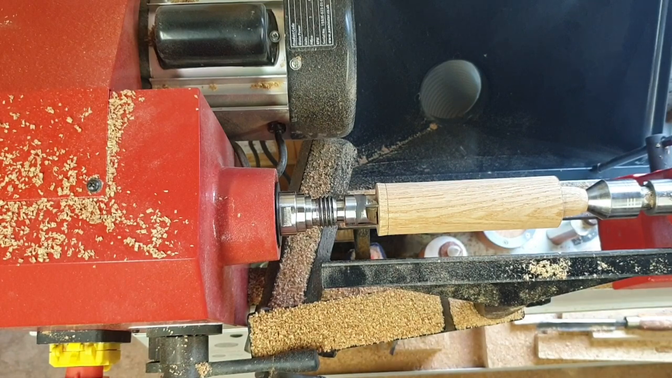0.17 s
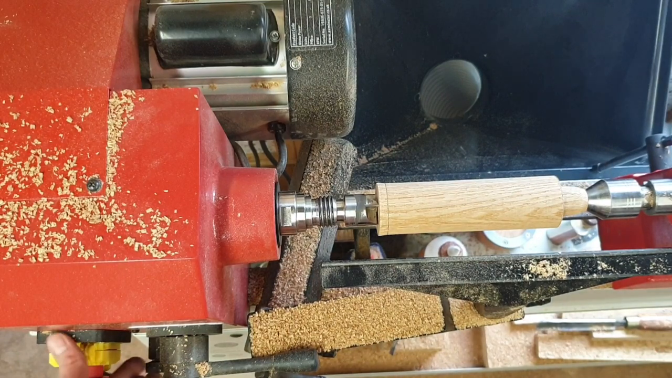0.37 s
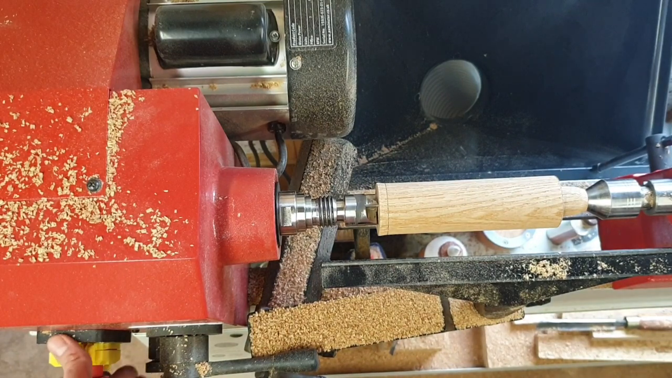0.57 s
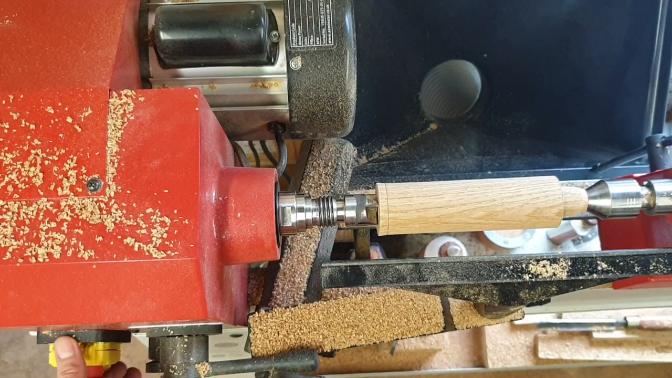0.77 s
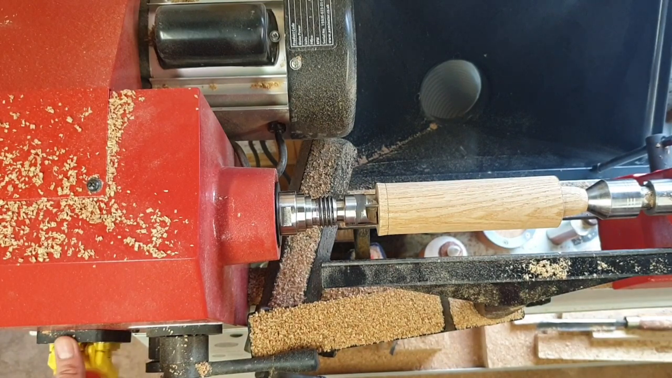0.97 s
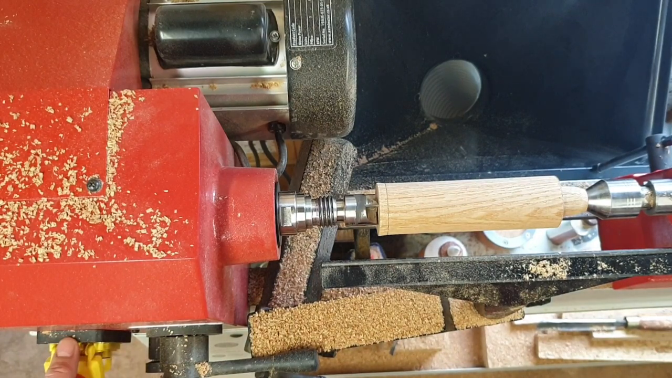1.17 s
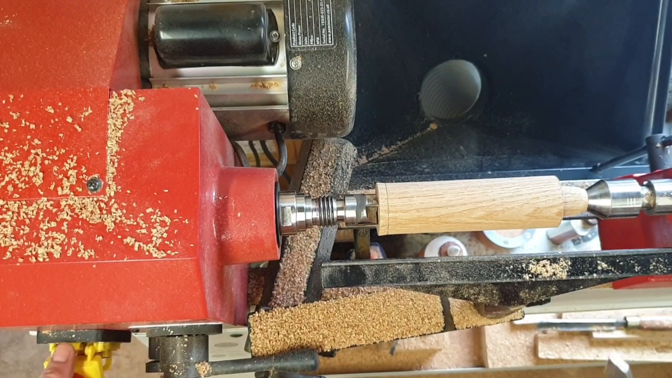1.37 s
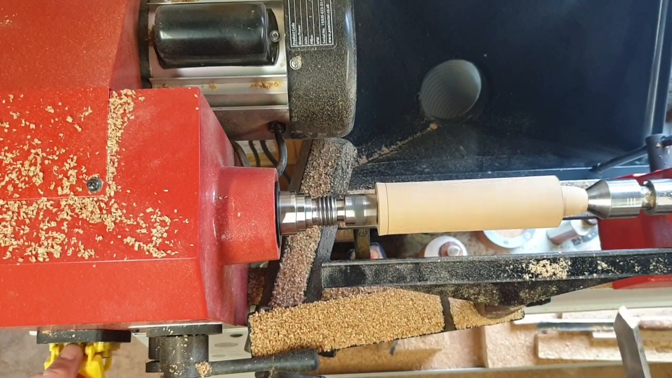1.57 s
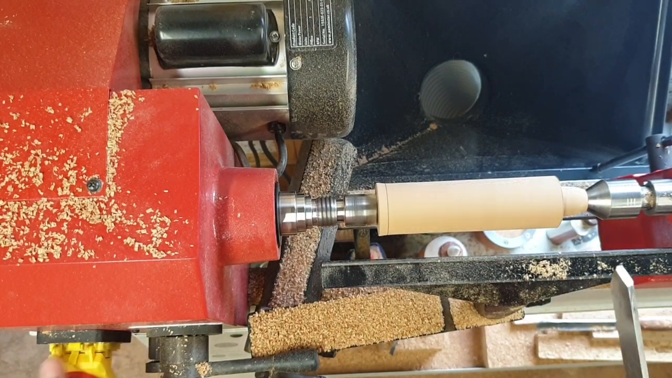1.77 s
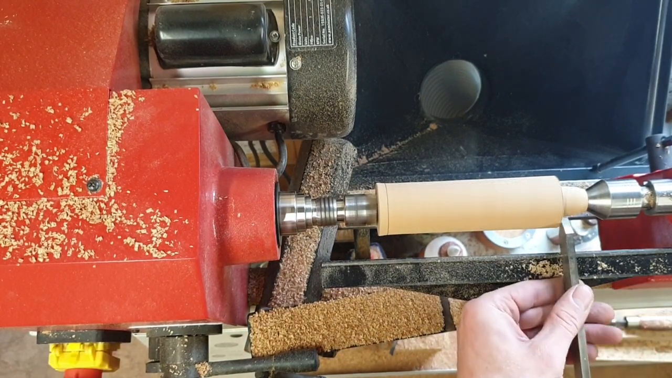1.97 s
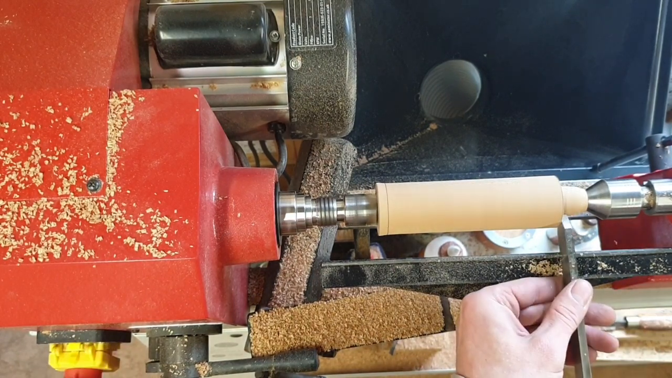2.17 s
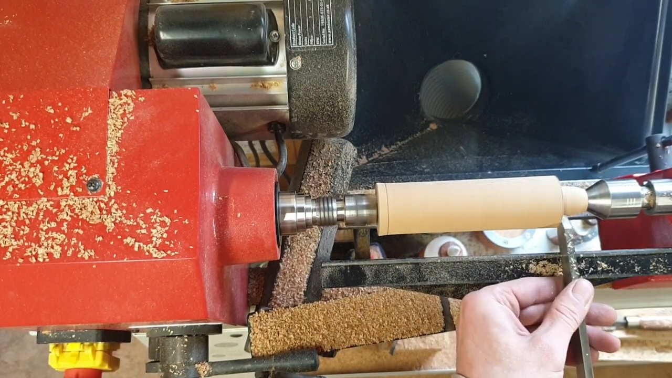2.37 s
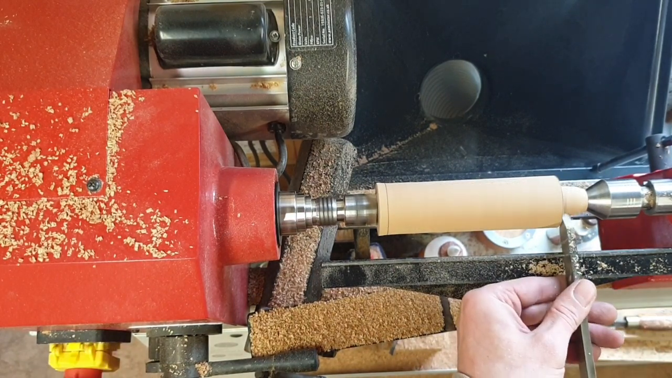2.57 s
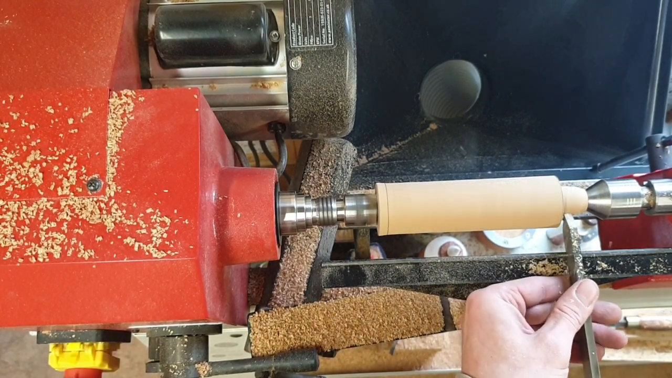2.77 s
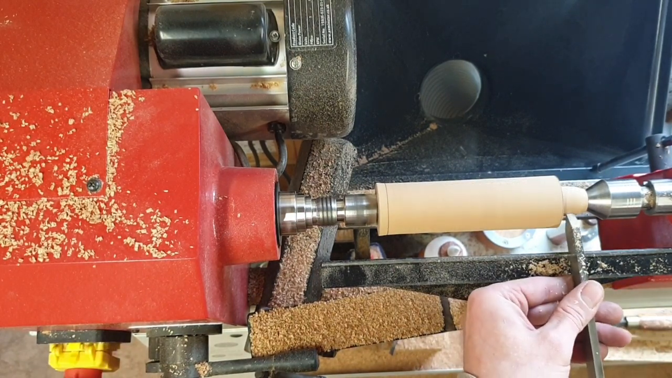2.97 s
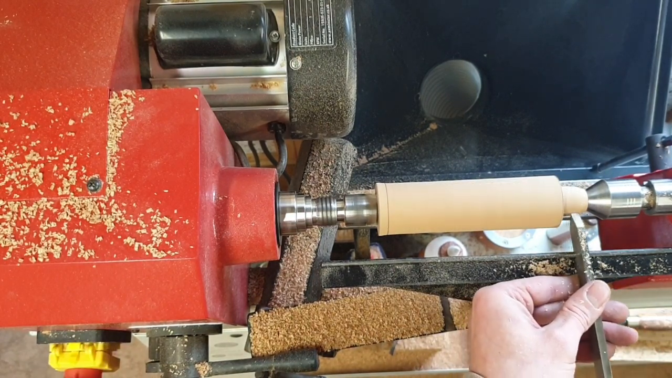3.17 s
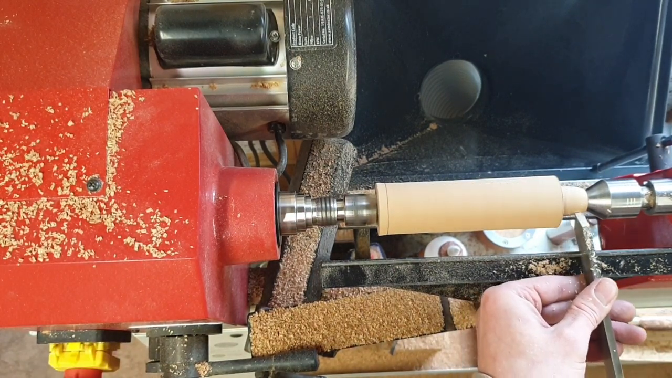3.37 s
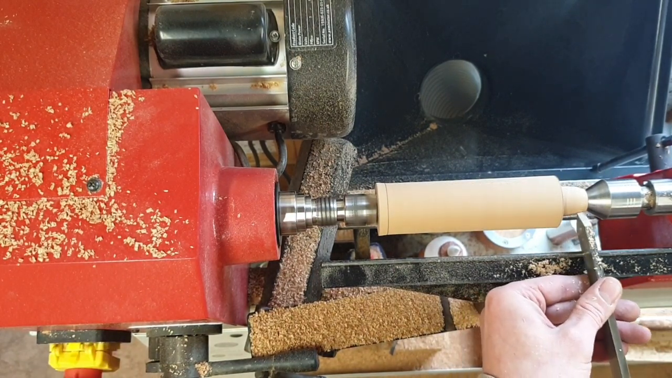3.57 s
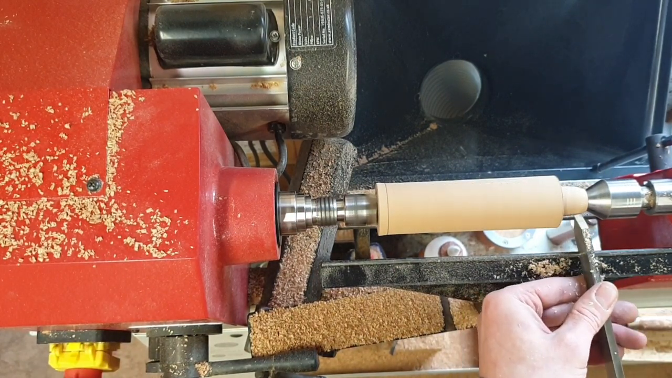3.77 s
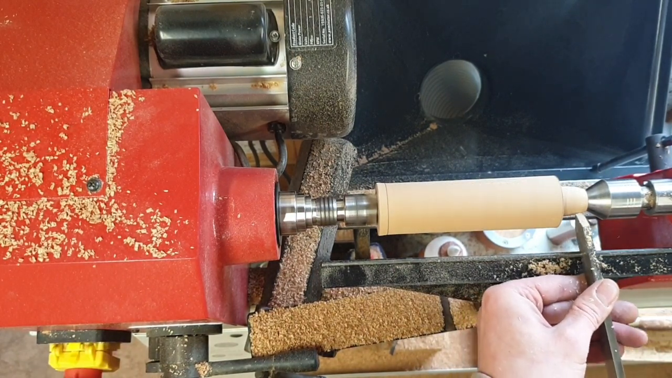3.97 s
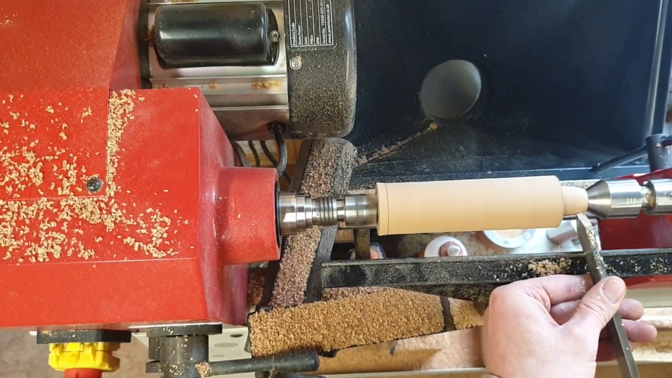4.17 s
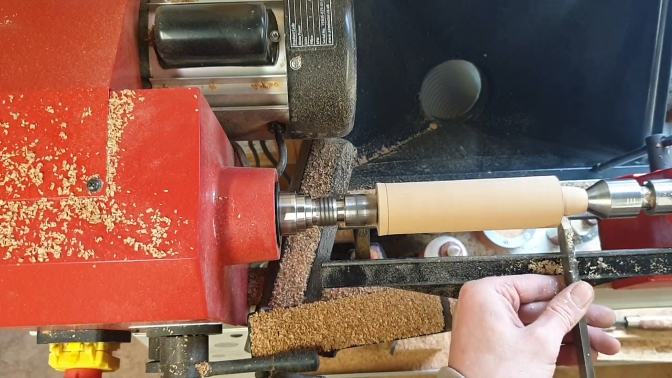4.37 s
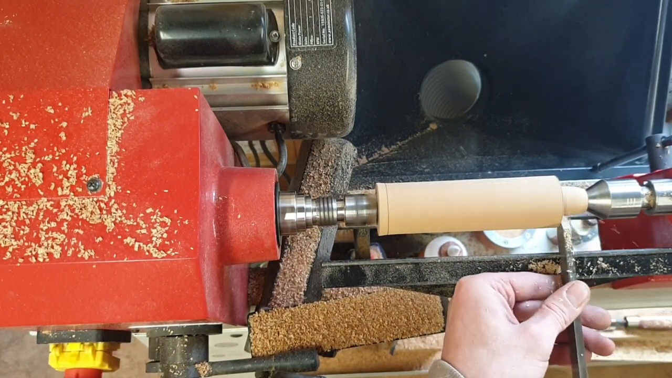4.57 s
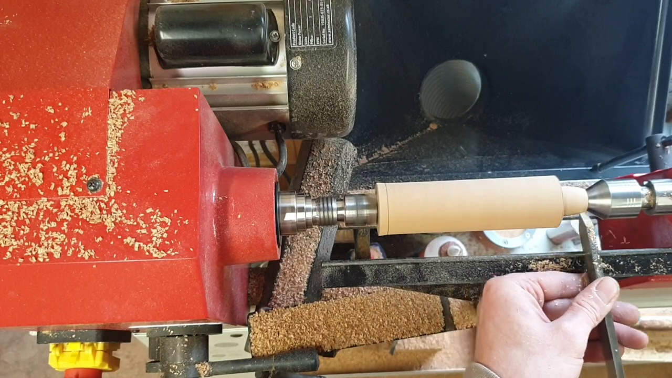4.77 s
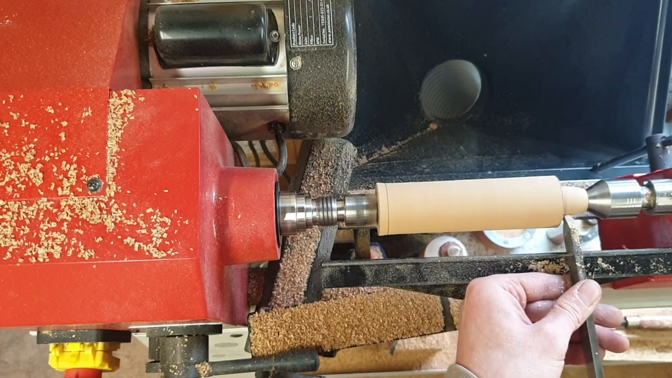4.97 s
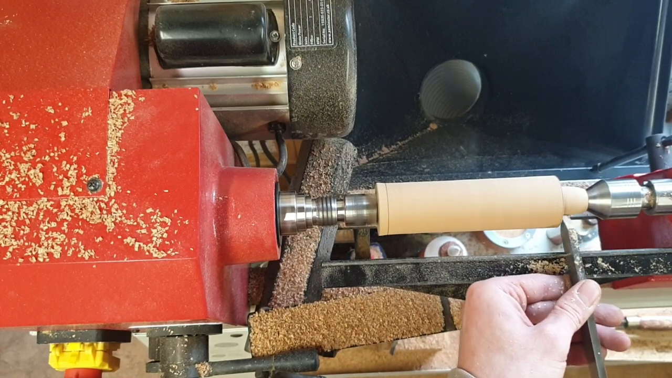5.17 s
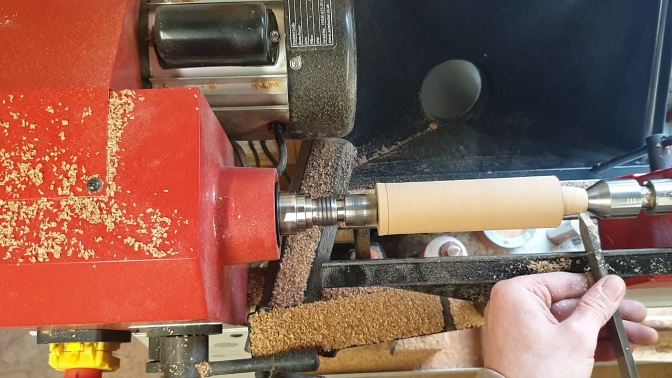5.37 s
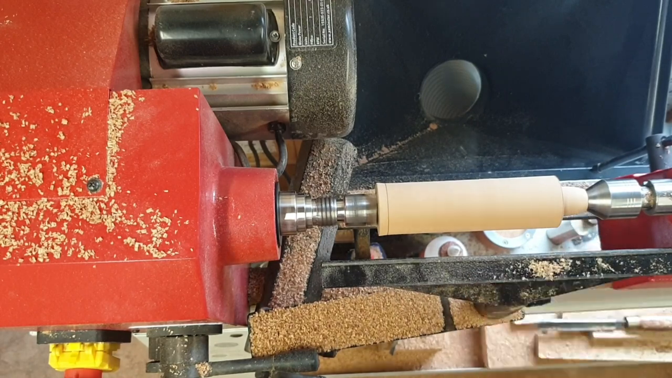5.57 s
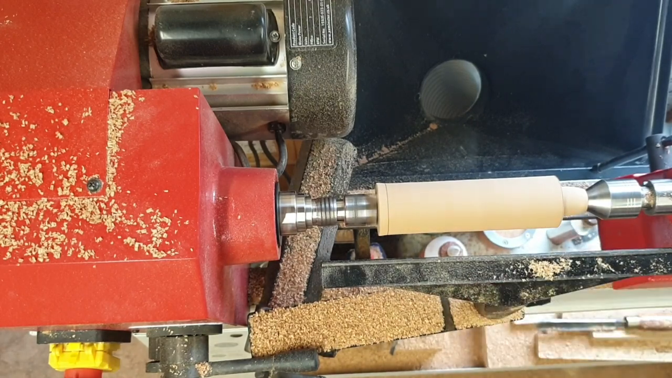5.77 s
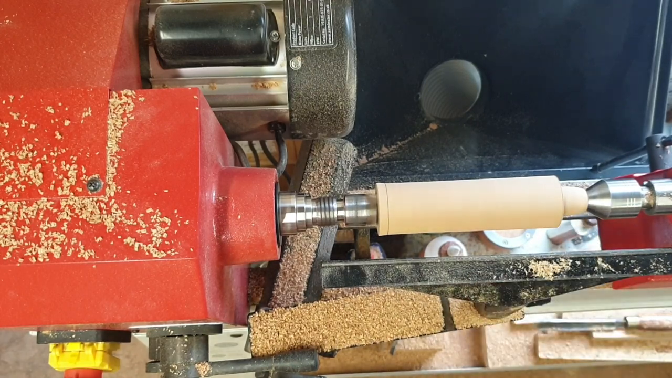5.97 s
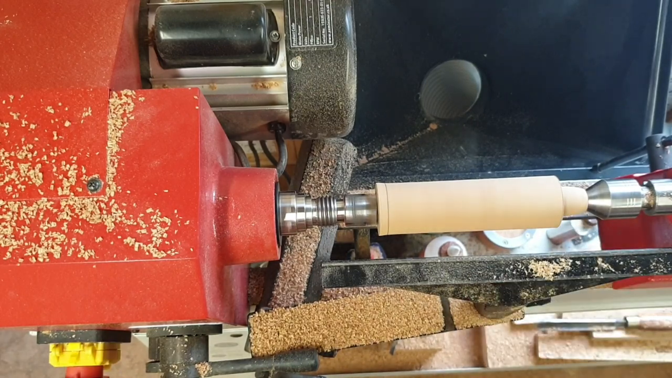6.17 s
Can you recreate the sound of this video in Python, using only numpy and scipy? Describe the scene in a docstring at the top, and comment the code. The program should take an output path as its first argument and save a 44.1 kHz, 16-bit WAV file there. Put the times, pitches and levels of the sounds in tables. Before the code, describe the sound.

In a quiet workshop, a hand makes a few soft, low bumps and faint clicks on a small wood lathe. At about 1 second the switch clacks. Around 1.6 seconds a louder metallic clank starts the belt, and the machine spins up with another knock and a brief shudder. It settles into a steady drone with a light rattle of pulleys and bearings. From about 2 seconds a chisel bites the spinning wood in short, uneven strokes, each a raspy hiss with a slight ring of steel and a growl from the tool rest. The longest cut runs from about 4.3 to 4.8 seconds. The cutting ends near 5.5 seconds and the lathe runs on alone until a last knock just after 6 seconds, when the sound quickly dies away. Everything is heard from close above, with a short room reverb.

```python
"""Soft bumps of a hand on a small wood lathe, then the clack of its switch and a clank as the belt starts.
The drive shakes the frame into a drone while loose pulleys and bearings rattle against the housing.
A chisel bites the spinning blank in short strokes: snapping fibres hiss, the steel rings, the rest growls.
With a last knock the running sound dies away. All is heard from just above, in a short workshop reverb."""
import sys
import numpy as np
from scipy import signal
from scipy.fft import rfft, irfft, next_fast_len
from scipy.io import wavfile
from scipy.ndimage import map_coordinates

SR = 44100
rng = np.random.default_rng(int(sys.argv[2]) if len(sys.argv) > 2 else 0)


def wav_record(signal):
    """Record a signal, one row per channel, as 16-bit PCM in the file named by sys.argv[1]."""
    frames = np.transpose(np.atleast_2d(signal))
    bounded = np.clip(frames, -1, 1)
    # unit amplitude maps onto the largest positive 16-bit level
    quanta = np.round(bounded * 32767).astype(np.int16)
    wavfile.write(sys.argv[1], SR, quanta)


N = 274698


def amp(db):
    """Decibels to gain."""
    return 10 ** (np.asarray(db) / 20)


def unit(x):
    """Scaled to rms 1."""
    return x / np.sqrt(np.mean(x ** 2) + 1e-20)


def clock():
    """The time of every sample."""
    return np.arange(N) / SR


def since(s):
    """Seconds gone by since s; 0 before it."""
    return np.maximum(clock() - s, 0)


def along(points, hz):
    """A curve through (Hz, value) points on a log frequency axis."""
    f, v = np.transpose(points)
    return np.interp(np.log(hz + 1), np.log(f + 1), v)


def wobble(rate):
    """A smooth random modulator of rms 1, rate knots a second."""
    return unit(map_coordinates(rng.standard_normal(int(N * rate / SR) + 4), [clock() * rate]))


def filtered(x, response):
    """x times a complex response of frequency."""
    size = next_fast_len(N + SR // 2)
    return irfft(rfft(x, size) * response(np.fft.rfftfreq(size, 1 / SR)), size)[..., :N]


def coloured(x, spectrum):
    """x through an EQ curve, at rms 1."""
    return unit(filtered(x, lambda hz: amp(along(spectrum, hz))))


def resonate(x, modes):
    """x rings a bank of resonances of alternating polarity; rms 1."""
    def bank(f):
        return sum((-1) ** k * amp(db) * 1j * f * width / (hz * hz - f * f + 1j * f * width)
                   for k, (hz, width, db) in enumerate(modes))
    return unit(filtered(x, bank))


# stereo image: (frequency [Hz], left-right likeness [-1..1])
LIKENESS = [(60, 1), (290, 0.97), (640, 0.74), (1410, 0.25), (3100, -0.48), (6800, 0.19), (15000, -0.31)]
# the machine stands a little to the left: (frequency [Hz], left over right [dB])
BALANCE = [(60, .4), (200, 1.8), (380, 1.1), (700, -.3), (1300, 1.8), (2400, -.7), (4400, -1), (8000, .5),
           (15000, 1.5)]

def spread(pair):
    """Two unrelated signals become left and right: alike in the bass, wide in the treble."""
    def mid_side(hz):
        angle = np.arccos(np.clip(along(LIKENESS, hz), -1, 1)) / 2
        return np.array([np.cos(angle), np.sin(angle)])
    mid, side = filtered(pair, mid_side)
    stereo = np.array([mid + side, mid - side])
    return unit(filtered(stereo, lambda hz: amp(np.outer([.5, -.5], along(BALANCE, hz)))))


def noise():
    """White stereo noise."""
    return spread(rng.standard_normal((2, N)))


def grains(rate, scatter_db):
    """Tiny impacts of uneven size at random moments, rate a second."""
    hit = rng.random(N) < rate / SR
    size = amp(scatter_db * np.clip(rng.standard_normal(N), -2, 2))
    return spread(hit * size * rng.standard_normal((2, N)))


# EQ of the quiet workshop: (frequency [Hz], level [dB])
ROOM_TONE_EQ = [(15, -39), (25, -12), (70, 1), (473, -27), (929, -27), (1010, -26), (3580, -27.5),
                (7420, -37), (10500, -30), (15800, -30)]

def room_tone():
    """A faint bed of low rumble and air under everything."""
    return amp(-69) * coloured(noise(), ROOM_TONE_EQ)


# bump cues: (time [s], hold [s], level [dB])
HAND_BUMPS = [(0.024, 0.054, -47), (.075, .015, -43), (0.193, .05, -57), (0.304, 0.041, -56),
              (.41, 0.027, -71), (0.48, .04, -70), (.699, 0.062, -55), (1.37, .05, -65)]
# EQ of a thud through the bench: (frequency [Hz], level [dB])
BUMP_EQ = [(25, -10), (70, 0), (125, 3), (220, -12), (300, -15.5), (500, -25), (1000, -37), (2000, -42),
           (4000, -85)]

def hand_bumps(attack_s=0.01, t60=0.28):
    """The hand's bumps come through the bench as soft, bassy thuds."""
    envelope = sum(amp(db - 60 * since(s + hold) / t60) * np.tanh(since(s) / attack_s)
                   for s, hold, db in HAND_BUMPS)
    return envelope * coloured(noise(), BUMP_EQ)


def struck(modes):
    """One blow: each resonance rings at its own phase, and the wider it is the sooner it dies."""
    hz, width, db = np.transpose(modes)[:, :, None]
    t = np.arange(SR // 4) / SR
    phase = rng.uniform(0, 2 * np.pi, (2, len(modes), 1))
    size = amp(db) * np.sqrt(width)  # wide resonances take up more of the blow
    ring = (size * np.sin(2 * np.pi * hz * t + phase) * np.exp(-np.pi * width * t)).sum(1)
    return ring * (1 - np.exp(-t / 0.00025)) / np.linalg.norm(size)


# hits of hand, switch and drive:
# (time [s], level [dB], ring over knock [dB], snap over knock [dB], knock t60 [s])
HITS = [(0.08, -53.5, -14, -34, 0.14), (.337, -64, 6, -1, 0.22), (0.37, -66, 16, 2, 0.16),
        (.538, -71, -12, 8, .04), (.699, -63, -8, -6, 0.18), (1.003, -44.5, -7, -3.5, 0.083),
        (1.017, -49, -8, -1.5, 0.3), (1.056, -48.5, 3, 10.5, 0.21), (1.17, -65, -17, 3, 0.081),
        (1.199, -68, -8, 6, 0.11), (1.616, -41.5, 4, 9, 0.12), (1.63, -48, -7, -6, 0.37),
        (1.664, -31, 15, 1.5, 0.085), (1.863, -32, 9, -14, 0.033), (6.072, -34, 11, -8, 0.026)]
# EQ of a hit's dull body: (frequency [Hz], level [dB])
KNOCK_EQ = [(60, -3), (220, -1.5), (310, 4.5), (480, 0), (700, -3.5), (1200, -3.5), (2500, -11),
            (5000, -30), (15000, -49)]
# EQ of its bright transient: (frequency [Hz], level [dB])
SNAP_EQ = [(500, -22), (2000, 1), (3500, 3), (5000, -1), (7000, -7), (11000, -4.5), (15500, -17)]
# resonances of the headstock housing: (frequency [Hz], width [Hz], level [dB])
HOUSING_MODES = [(860, 90, -7), (1148, 40, -1.5), (1565, 50, 0), (1692, 32, 2.5), (1790, 50, -1),
                 (2128, 45, -1.5), (2550, 300, -10), (3120, 200, -11), (4200, 600, -16), (5600, 250, -21)]

def clacks(attack_s=0.0011):
    """Each contact layers a dull knock, a snap that dies twice as fast, and the ring of the housing."""
    knock, snap = coloured(noise(), KNOCK_EQ), coloured(noise(), SNAP_EQ)
    out = np.zeros((2, N + SR))
    for s, db, ring_db, snap_db, t60 in HITS:
        age = since(s)
        attack = 1 - np.exp(-age / attack_s)
        decay = amp(-60 * age / t60)
        out[:, :N] += amp(db) * attack * decay * (knock + amp(snap_db) * decay * snap)
        ring = amp(db + ring_db) * struck(HOUSING_MODES)
        start = round(s * SR)
        out[:, start:start + ring.shape[1]] += ring
    return out[:, :N]


# swish cues: (peak time [s], half length [s], level [dB])
HAND_SWISHES = [(0.817, 0.041, -63.5), (1.477, 0.043, -69.5)]
# airy bands of a swish: (frequency [Hz], width [Hz], level [dB])
SWISH_BANDS = [(4800, 480, -2), (8300, 900, -21)]

def hand_swishes():
    """The hand brushes past the switch: soft swells of high, band-passed noise."""
    envelope = sum(amp(db) / (1 + ((clock() - s) / half) ** 2) ** 2 for s, half, db in HAND_SWISHES)
    air = resonate(noise(), SWISH_BANDS)
    return envelope * resonate(air, [(4970, 3100, 0)])


def sheet_metal(start_s=1.06, t60=7):
    """The sheet metal sings on faintly after the first clack of the switch."""
    age = since(start_s)
    ring = resonate(noise(), [(390, 120, -0.5), (1330, 43, 4), (2030, 860, -10)])
    return (age > 0) * amp(-71.5 - 60 * age / t60) * ring


def turns(hz, drift):
    """Phase of a shaft or hum whose speed wanders slightly."""
    return 2 * np.pi * np.cumsum(hz * (1 + drift * wobble(7))) / SR


def drive_envelopes(start_s=1.633, shudder_s=1.83, stop_s=6.077):
    """The drive spins up, shudders as it reaches speed, runs and dies away: gains of drone and rattle."""
    age, ending = since(start_s), since(stop_s)
    shudder = np.exp(-((clock() - shudder_s) / 0.083) ** 2)
    settling_db = 0.34 * age  # the drone eases as the drive settles
    drone_db = -27.5 - settling_db + 4.5 * shudder - 10 * (ending / 0.11) ** 2
    rattle_db = -36.5 + 4 * shudder - 164 * ending
    return amp(drone_db) * np.tanh(age / 0.13), amp(rattle_db) * np.tanh(age / 0.042)


# resonances of the bed and stand: (frequency [Hz], width [Hz], level [dB])
FRAME_MODES = [(63.7, 11, -7.5), (105, 27, -10), (155, 17, -13.5), (197.6, 21.4, -8.5), (294, 27, -2.5),
               (348.7, 53, -3.5), (401.3, 27, 2), (448.4, 70.7, -6)]
# hums of the drive: (pitch [Hz], level [dB], waver [dB], drift [share of pitch])
DRIVE_HUMS = [(200.8, -12, 0.5, .012), (350.3, -5, 0.5, 0.00503), (403, -9.5, 2, 0.00904)]

def frame_drone(motor, level, left_db=1.4):
    """The motor shakes the frame once a turn, under a few steady hums that throb with it."""
    shaking = grains(rate=5000, scatter_db=.5) * amp(5 * np.cos(motor))
    throb = 1 + .3 * np.cos(motor - 1.2)
    hum = sum(np.sqrt(2) * amp(db + waver_db * wobble(25)) * np.sin(turns(hz, drift))
              for hz, db, waver_db, drift in DRIVE_HUMS)
    pan = amp(np.outer([.5, -.5], left_db))
    return level * (amp(-2) * resonate(shaking, FRAME_MODES) + throb * hum * pan)


# EQ of the belt's rush: (frequency [Hz], level [dB])
BELT_EQ = [(20, -18), (60, 1.5), (250, -5), (450, -7), (570, -8.5), (830, -1), (1330, -3.5), (2000, -4.5),
           (3000, -5), (4500, -16), (7000, -22.5), (9000, -31), (15500, -33)]

def pulley_rattle(spindle, level):
    """Play in pulleys and bearings ticks on the housing, hardest once a turn, over the belt's rush."""
    once_a_turn = amp(1.5 * np.cos(spindle))
    flutter = unit(once_a_turn * amp(.9 * wobble(110)))
    ticks = resonate(grains(rate=800, scatter_db=0.5) * flutter, HOUSING_MODES)
    belt = coloured(grains(rate=9000, scatter_db=0) * flutter, BELT_EQ)
    return level * (ticks + amp(1) * belt)


# stroke cues: (time [s], length [s], level [dB], pressure ramp [dB], growl send of a deep cut [dB])
CHISEL_STROKES = [ (2.032, 0.041, -44, -2, -5), (2.125, 0.31, -33, 2, -3.5), (2.525, 0.092, -33, 3.5, -6),
                  (2.754, 0.074, -33.5, 5, -1.5), (2.921, 0.043, -32, 2.5, -8), (3.02, .064, -35, 3, -1),
                  (3.117, 0.12, -38.5, -4.5, -5), (3.298, 0.099, -33.5, 9.5, -1.5),
                  (3.459, 0.13, -37.5, 9, 1), (3.654, 0.078, -35.5, 1.5, 2.5), (3.8, 0.051, -33.5, 1, 1.5),
                  (3.894, 0.12, -38.5, -8, 0.5), (4.084, 0.13, -37.5, 5.5, 3.5),
                  (4.279, 0.5, -33.5, 0, -.5), (4.849, 0.091, -40.5, 3, -10), (4.943, 0.16, -32.5, -3, 2),
                  (5.196, .262, -37.5, -9, 1), ]

def stroke_envelopes(bite_s=0.0053):
    """Each stroke bites quickly, holds with rising or easing pressure and lifts: gains of hiss, growl."""
    t, bite, growl = clock(), np.zeros(N), np.zeros(N)
    for s, length, db, ramp_db, growl_db in CHISEL_STROKES:
        lift_s = 0.0052 + 0.013 * length  # the edge leaves a long stroke more slowly
        attack = (1 + np.tanh((t - s) / bite_s / 2)) / 2
        release = (1 + np.tanh((s + length - t) / lift_s / 2)) / 2
        progress = np.clip((t - s) / length, 0, 1)
        force = attack * release * amp(db + ramp_db * (progress - .5))
        bite += force
        growl += force * amp(growl_db)
    return bite, growl


# EQ of the shavings' hiss, left and right: (frequency [Hz], level [dB])
HISS_EQ_LEFT = [(2000, 1), (4800, -10.5), (5600, 0), (7100, -15), (8200, 1), (9600, 0.5), (10800, -3),
                (12300, -2), (14000, -2), (15700, -12.5)]
HISS_EQ_RIGHT = [(2000, -6), (4000, -4), (4900, -11), (5600, 0.5), (7300, -7.5), (8200, -3.5), (9500, -2),
                 (10700, -14), (11700, -1), (14000, -5.5), (15700, -4)]
# how keenly the edge meets the wood: (time [s], high shelf on the hiss [dB])
EDGE_KEENNESS = [(2.15, -1), (2.95, 3), (3.35, 5.5), (4.28, 4.5), (4.5, -3.5), (4.7, 4), (4.9, 1.5),
                 (5.3, 6)]
# resonances of the chisel and of the tool rest: (frequency [Hz], width [Hz], level [dB])
CHISEL_MODES = [(1550, 224, -1.5), (2590, 320, -1), (3100, 440, -1.5), (3700, 810, -4), (5670, 240, -8)]
REST_MODES = [(630, 65, -7), (751, 50, -7), (850, 61, -9.5)]

def chisel_cut(spindle, bite, growl):
    """Fibres snap at the edge, more as the blank's hard side comes round; chisel and rest ring along."""
    once_a_turn = amp(1.5 * np.cos(spindle))
    wood_grain = unit(once_a_turn * amp(1.9 * wobble(75) + 0.83 * wobble(540)))
    fibres = grains(rate=22000, scatter_db=3) * wood_grain
    hiss = unit(filtered(fibres, lambda hz: amp([along(HISS_EQ_LEFT, hz), along(HISS_EQ_RIGHT, hz)])))
    sizzle = filtered(hiss, lambda hz: np.clip((hz - 10200) / 1500, 0, 1))  # the finest fibres
    keenness = amp(np.interp(clock(), *np.transpose(EDGE_KEENNESS)))
    shavings = hiss + (keenness - 1) * sizzle
    steel = resonate(grains(rate=5000, scatter_db=-1.5) * wood_grain, CHISEL_MODES)
    rest = resonate(grains(rate=1500, scatter_db=6) * wood_grain, REST_MODES)
    return bite * (amp(3.5) * shavings + amp(-1.27) * steel) + amp(-4.5) * growl * rest


def early_reflections(x, count):
    """Bed, hand and dust hood return thin copies within a few milliseconds, different at each ear."""
    delay_s = rng.uniform(0.001213, .009, (count, 2, 1))
    polarity = rng.choice([-1, 1], (count, 2, 1))
    def echoes(hz):
        taps = (polarity * np.exp(-2j * np.pi * hz * delay_s)).sum(0) / np.sqrt(count)
        return taps * hz / (hz + 1500)  # low cut
    return filtered(x, echoes)


# decay of the workshop: (frequency [Hz], t60 [s])
REVERB_TIMES = [(150, 0.2), (1500, 0.32), (6000, 0.13), (14000, 0.13)]

def workshop_reverb(x):
    """The room's short tail, each frequency dying at its own speed."""
    hz, t, bands = signal.stft(rng.standard_normal((2, SR // 2)), SR, nperseg=256)
    low_cut = (hz / (hz + 250))[:, None]  # little bass comes back
    decay = amp(-60 * t / along(REVERB_TIMES, hz)[:, None])
    tail = signal.istft(bands * low_cut * decay, SR, nperseg=256)[1]
    return signal.fftconvolve(x, tail / np.linalg.norm(tail[0]), axes=1)[:, :N]


def scene():
    """The mix: rattle, chisel and clacks feed the room; the other layers stay dry."""
    motor, spindle = turns(hz=58.96, drift=0.0019), turns(hz=42.85, drift=0.0024)
    bite, growl = stroke_envelopes()
    drone_level, rattle_level = drive_envelopes()
    bright = pulley_rattle(spindle, rattle_level) + chisel_cut(spindle, bite, growl) + clacks()
    space = amp(-6) * early_reflections(bright, count=14) + amp(-11) * workshop_reverb(bright)
    bed = room_tone() + frame_drone(motor, drone_level)
    return bed + bright + space + sheet_metal() + hand_bumps() + hand_swishes()


def record(dry):
    """A steep high cut near 16 kHz on the whole mix."""
    return filtered(dry, lambda hz: np.clip((16080 - hz) / 250, 0, 1))


dry = scene()
out = record(dry)
wav_record(out)
```